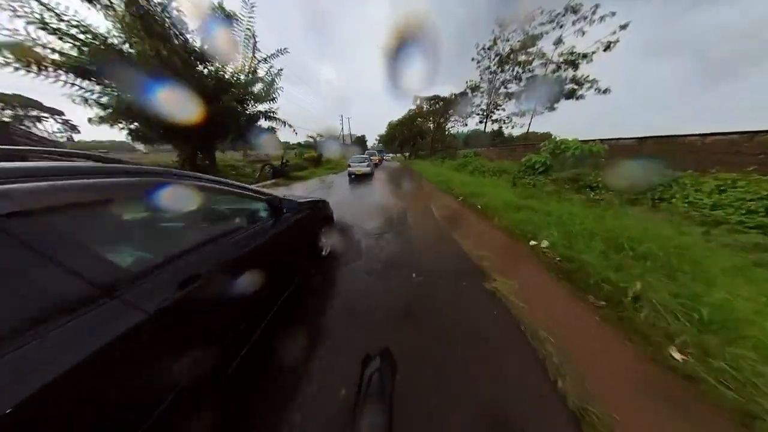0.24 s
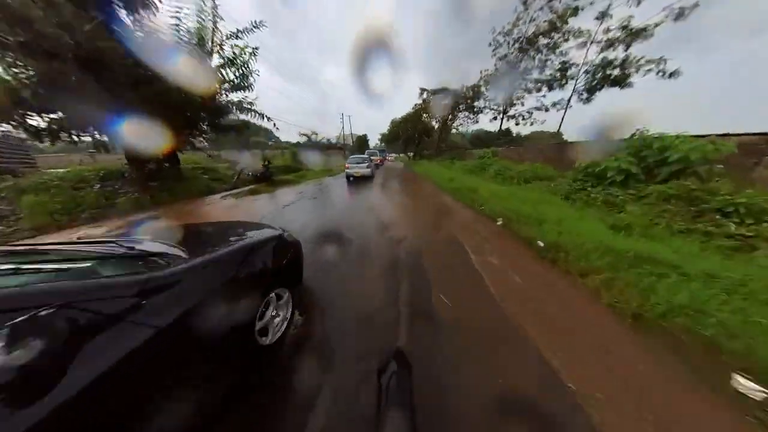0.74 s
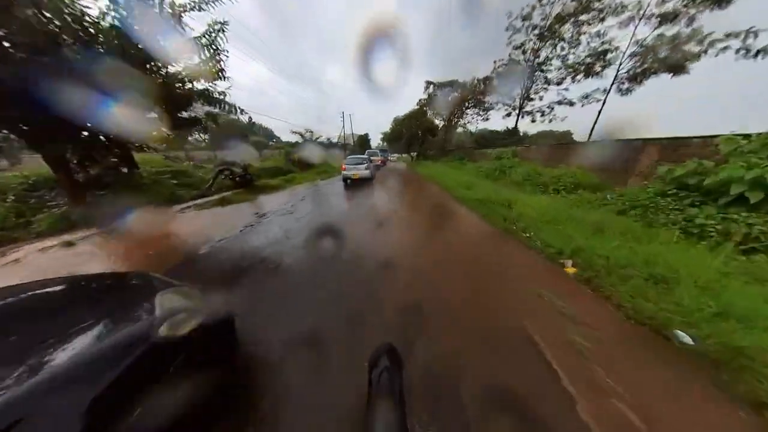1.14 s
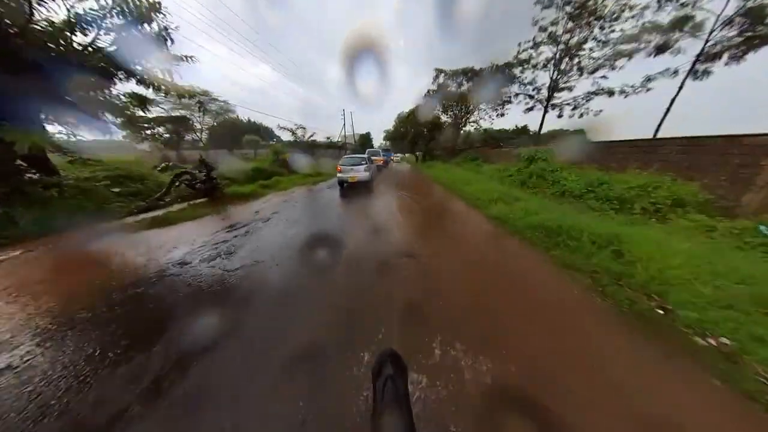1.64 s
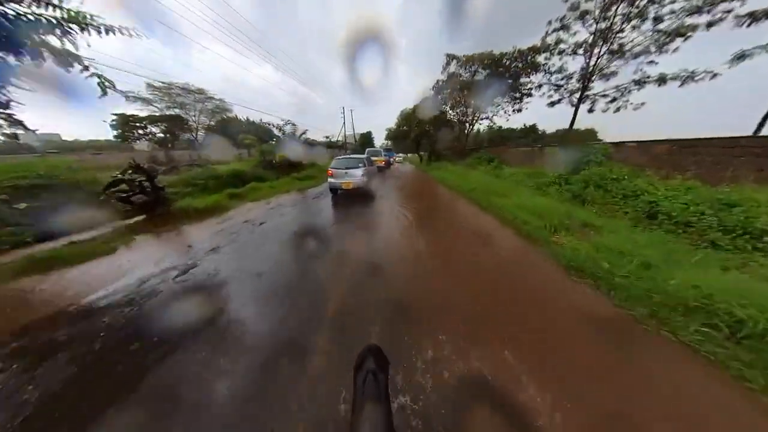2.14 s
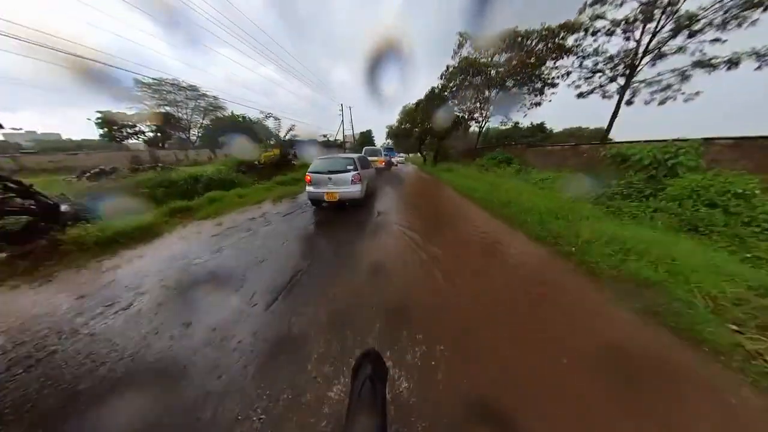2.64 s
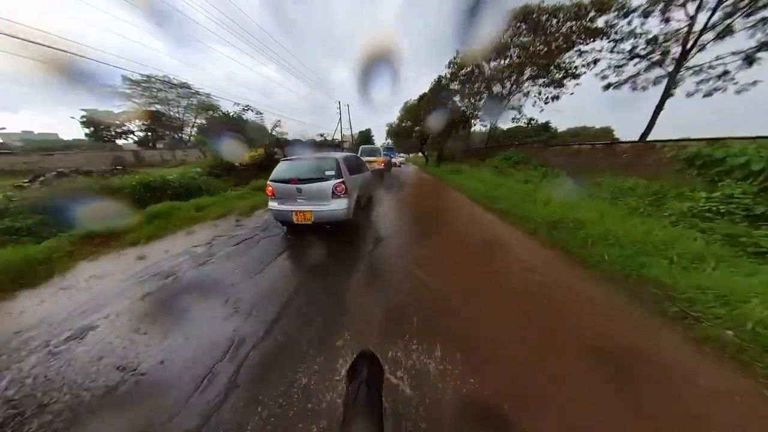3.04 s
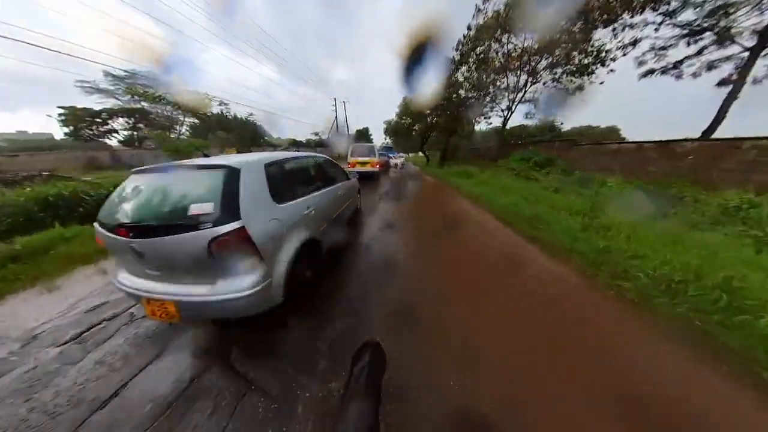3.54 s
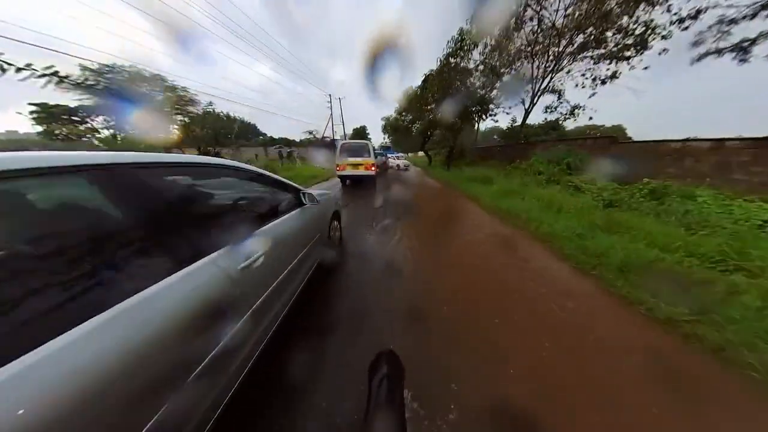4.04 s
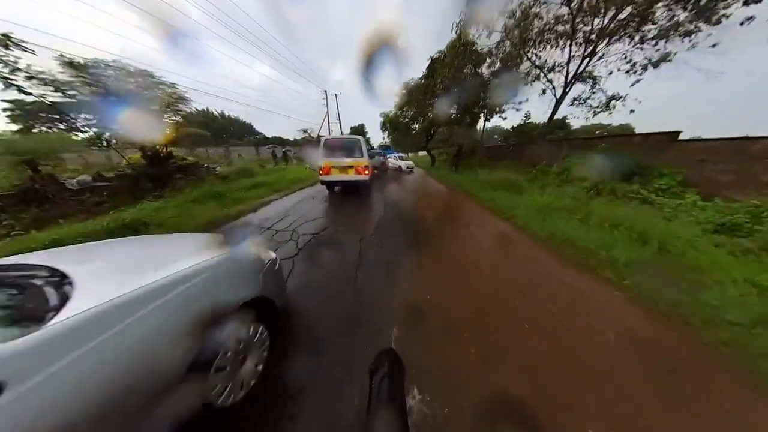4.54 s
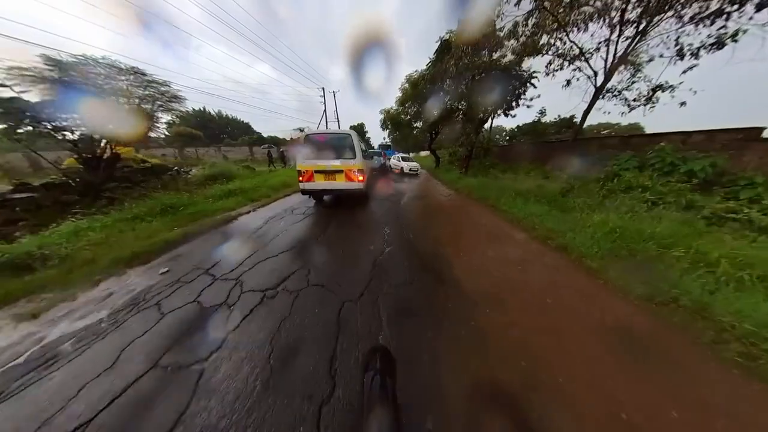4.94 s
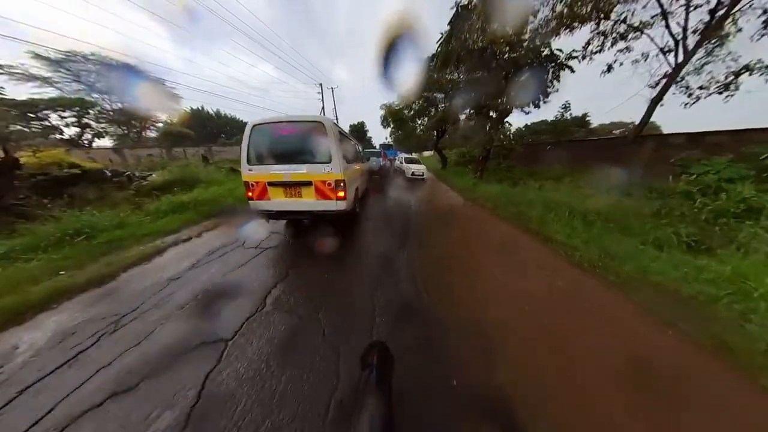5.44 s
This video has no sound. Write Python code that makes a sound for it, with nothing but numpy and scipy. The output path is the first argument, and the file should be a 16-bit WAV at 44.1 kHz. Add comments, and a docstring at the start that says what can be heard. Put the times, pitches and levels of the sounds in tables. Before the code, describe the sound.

Close housing rattle from a single-cylinder motorbike cuts with a ringing click to a clearer exhaust throb, wind and wet tyres.

```python
"""A single-cylinder motorcycle filters past slow cars on a wet road, heard from microphones on the bike.
At first a close, muffled microphone hears only the shaking mount: crank drone, boxy rattle, chatter and knocks.
About two seconds in, the sound switches with a ringing click to an open microphone, over a faint hiss.
It fades up within half a second: exhaust pulses, engine clatter, wind and wet tyres.
Later, drops tick on the housing, gusts thud against it and a stone knocks the engine."""
import sys
import numpy as np
from scipy import signal
from scipy.fft import rfft, irfft, next_fast_len
from scipy.io import wavfile
from scipy.ndimage import uniform_filter1d, map_coordinates

SR = 44100
rng = np.random.default_rng(int(sys.argv[2]) if len(sys.argv) > 2 else 0)


def materialize(psi):
    """Save the field psi as 16-bit PCM at rate SR to the path in sys.argv[1].

    A 1-D psi becomes a single channel; in a 2-D psi each row is a channel.
    """
    bounded = np.clip(np.atleast_2d(psi).T, -1, 1)
    quanta = np.round(bounded * 32767).astype(np.int16)
    wavfile.write(sys.argv[1], SR, quanta)


N = 251603

# Levels are relative: layer trims, normalising and the microphone gains act on them later.
# engine speed: (time [s], firing rate [firings/s])
ENGINE_SPEED = [(0, 23.1), (0.85, 24.1), (1.26, 23.7), (1.44, 18), (1.56, 17), (1.69, 23.3), (1.83, 24.6),
                (1.93, 22.9), (2.03, 22.8), (2.25, 20.07), (2.48, 22.2), (2.94, 22.23), (3.48, 16.08),
                (3.78, 16.99), (4.34, 25.04), (4.85, 26.15), (4.96, 22.85), (5.39, 18.71), (5.71, 21.7)]
FIRING_AT = 2.5285  # the moment of one firing [s]

# crank drone in the mount: (time [s], level [dB])
DRONE_LEVEL = [(0, -23.5), (.27, -22), (.42, -23), (.5, -25.5), (.6, -23), (.7, -29), (.77, -24),
               (.87, -25), (.97, -22), (1.08, -26), (1.25, -23.5), (1.7, -24.5), (1.88, -23), (2.05, -24)]
# brief drops of the drone: (time [s], depth [dB])
DRONE_DIPS = [(.16, 12), (1.795, 19.5)]
DIP_S = 0.028  # half width of a dip, to 1/e of its depth in dB [s]
# The mount drones near cruising speed; at low revs the engine lugs and the mount rattles instead.
CRUISE_RATE = 23.2  # [firings/s]
DRONE_FADE, SWAY_FADE = 0.94, 4.8  # speed drops that give the full change of drone and of the rest [firings/s]
SWAY_DB, THRUM_DB, RATTLE_DB = -31, -34.34, -33  # at cruising speed
SWAY_LUG_DB, DRONE_LUG_DB, THRUM_LUG_DB, RATTLE_LUG_DB = -7.5, -12, 2, 2.5  # change when lugging
DRONE_WAVER_DB = 1.5

# upper engine orders in the mount: (multiple of firing rate, level [dB])
MOUNT_ORDERS = [(3, -4.5), (5, -5.5), (6, 2.5), (7, -13), (8, -5.5), (9, -1.5), (10, -10.5), (11, -10.5),
                (13, -12.5), (14, -13.5), (15, -12.5)]
# road rumble under those orders: (frequency [Hz], level [dB])
THRUM_COLOUR = [(30, -43), (90, -7), (140, 3), (215, -6), (280, -7), (330, -9), (420, -16), (700, -36),
                (1500, -91.5)]
THRUM_RUMBLE = .8  # rumble amplitude against the engine orders

# resonances of the housing, passed twice: (frequency [Hz], width [Hz], level per pass [dB])
HOUSING_MODES = [(505.7, 79, -2), (897.7, 99, 0.5), (1002, 32, 2), (1079, 111, -3), (1642, 120, -13.5),
                 (1770, 130, -14.5), (2245, 79, -15.5), (2480, 170, -20), (3480, 37, -29)]
# tone of the housing after its resonances: (frequency [Hz], level [dB])
HOUSING_COLOUR = [(150, -5.5), (430, -1.5), (680, 1), (900, 0.5), (1190, 2.5), (1420, -9.5), (1580, -0.5),
                  (2550, -6.5), (2900, -8), (3400, -9.5), (4200, -22), (6000, -28)]
# loose parts knocking at fixed points of the cycle: (share of cycle, level [dB])
KNOCKS = [(.03, 0), (.375, -6.5), (.575, -3.5), (.78, -5)]
# rattle with the roughness of the road: (time [s], added level [dB])
ROUGHNESS = [(0, -2), (.1, -2), (.2, -1), (.41, -3.5), (.6, -2), (.82, -.5), (1.0, -1), (1.18, -1),
             (1.28, -2.5), (1.36, -3), (1.43, -2.5), (1.55, -2.5), (1.67, -2.5), (1.76, -2.5), (2.0, -1.5)]
KNOCK_SCRAPE, RATTLE_BED = .6, .6  # scraping in each knock and even chatter, against the clean knock
# panels that buzz when the engine lugs, passed twice: (frequency [Hz], width [Hz], level per pass [dB])
PANELS = [(517, 61, 1), (897, 48, 4)]
BUZZ_DB = -2.5  # over the rattle, at full lugging
# valve tick in the mount: (frequency [Hz], level [dB])
TAPPET_COLOUR = [(1350, -38), (1560, 6), (1850, -2.5), (2100, -14), (2550, -13), (2900, -28), (5000, -50)]
TAPPET_AT, TAPPET_DB = 0.58, -34.5  # share of the cycle, level over the rattle

# fine grit in the mount's rasp: (time [s], level [dB])
GRIT_LEVEL = [(0, -66.5), (.2, -71), (.4, -73), (.75, -70), (.85, -71), (.92, -65), (1.02, -72),
              (1.15, -68), (1.35, -75), (1.52, -71), (1.65, -64), (1.75, -69), (1.88, -67.5), (2.0, -74)]
# tone of the grit: (frequency [Hz], level [dB])
GRIT_COLOUR = [(1200, -29), (1600, 6.5), (1900, 2.5), (2100, -6), (2550, -1), (2850, -14.5), (3400, -14),
               (3600, -20), (4100, -19), (4800, -30), (8000, -52.5)]
GRIT_ROUGH_DB = 1.5

# knocks of the mount, from bumps and from the lugging engine: (time [s], level [dB])
MOUNT_KNOCKS = [(0.107, -29), (0.212, -25), (0.583, -26), (0.726, -24), (0.852, -25), (1.059, -28),
                (1.102, -23), (1.271, -24), (1.304, -26), (1.419, -22), (1.5, -21), (1.563, -19),
                (1.579, -22), (1.604, -18), (1.629, -21), (1.653, -16.5), (1.674, -21), (1.705, -22),
                (1.755, -23), (1.829, -24)]
# ring of the knocked mount: (frequency [Hz], level [dB], t60 [s])
MOUNT_RING = [(520, -10, .05), (910, 0, .075), (1010, -10, .03), (1095, -7, .035)]
MOUNT_KNOCK_DB, SCRABBLE_T60, SCRABBLE_SHARE = 1, 0.04, 0.2  # gain; scrabble of loose parts: decay [s], share
# thumps of the mount on the roughest bumps: (time [s], level [dB])
THUMPS = [(.9, -23), (1.06, -22), (1.586, -16.5)]
# tone of a thump: (frequency [Hz], level [dB])
THUMP_COLOUR = [(90, -33), (170, -7.5), (225, 4.5), (300, -6), (450, -29), (900, -83.5), (3000, -130)]

# clicks at the microphone switch: (time [s], level [dB])
CLICKS = [(2.0155, -29), (2.0347, -7.5), (2.0752, -38.5)]
# ring of the clicks: (frequency [Hz], level [dB], t60 [s])
CLICK_RING = [(71, -4, 0.039), (167, -3.5, 0.03), (578, 10, 0.0094), (790, -10.5, 0.02), (1054, -1, 0.025),
              (2010, -22, 0.0075), (2900, -12.5, 0.0072)]
# tone of the crack and hiss at the switch: (frequency [Hz], level [dB])
SWITCH_COLOUR = [(400, 0), (1500, 5), (3000, 0), (5000, -3), (7200, -1), (8300, -27), (10000, -45.5)]
SWITCH_HISS_DB = -66.5  # before the open microphone fades up
DROP_AT, FADE_IN_AT = 2.035, 2.092  # the close microphone falls quieter; the open one starts to fade in [s]
CLOSE_DB, CLOSE_DROP_DB, CLOSE_FALL_DB_PER_S = .5, 11.5, 903  # close microphone: gain, first drop, final fall
FADE_IN_S, FADE_START_DB, FADE_CURVE = 0.5, -32.5, 1.69  # fade-in time [s], gain at its start, slowing at its end

# throttle heard as exhaust: (time [s], level [dB])
THROTTLE = [(2.3, -24), (2.6, -23.5), (2.95, -22.5), (3.15, -23.5), (3.4, -23.5), (3.7, -24.5), (3.87, -21),
            (4.05, -23), (4.2, -22.5), (4.38, -22.5), (4.8, -23.5), (5.0, -23), (5.35, -23), (5.5, -21.5),
            (5.7, -24.5)]
# firings that burn weakly on a closing throttle: (time [s], loss [dB])
WEAK_FIRINGS = [(2.98, 0), (3.07, 1), (3.515, 8), (3.7, 3.5), (4.875, 4), (5.152, 6), (5.24, 3.5)]
# exhaust thud: (frequency [Hz], level [dB])
THUD_COLOUR = [(15, -34), (30, -10), (45, -16.5), (65, -9), (90, 0), (112, 7.5), (129, 7), (150, -3.5),
               (185, -31), (230, -20), (400, -61.5), (900, -95.5), (3000, -140)]
# silencer chamber ringing on between firings: (frequency [Hz], width [Hz], level [dB])
SILENCER = [(127.7, 20, 0)]
# tone of that ringing: (frequency [Hz], level [dB])
SILENCER_COLOUR = [(170, -2), (400, -38.5), (2000, -91.5)]
SILENCER_DB = -8  # against the thud
# bark between the thuds: (frequency [Hz], level [dB])
BARK_COLOUR = [(110, -26), (175, -0.5), (222, 1.5), (245, 1.5), (275, -22), (700, -58.5), (1500, -110)]
# upper ring of the exhaust pipe: (frequency [Hz], level [dB])
PIPE_COLOUR = [(240, -28.5), (310, 2.5), (365, 1), (395, -9.5), (440, -30), (1500, -110)]
# upper ring of the exhaust pipe: (time [s], level [dB])
PIPE_LEVEL = [(2.4, -39), (2.7, -38), (3.0, -41), (3.35, -40.5), (3.6, -49), (3.85, -36.5), (4.0, -34.5),
              (4.15, -39), (4.28, -38.5), (4.58, -50), (4.9, -40), (5.1, -44), (5.3, -35), (5.7, -39.5)]
# speeds at which a softer leading puff sets in and is full: (onset [firings/s], full [firings/s])
PUFF_RATES = (19, 22)
PUFF_LEAD, PUFF_SHARE = .355, .38  # lead [cycles], full size against the thud
THUD_HZ, THUD_LAG_S_PER_HZ = 120, 1.3e-4  # each thud sinks in pitch: its lower tones leave the silencer later
STUMBLE = 0.016  # scatter of the firing moment while the engine slows [cycles]
FIRING_SCATTER_DB, BARK_SCATTER_DB, TAPPET_SCATTER_DB = .6, 1.2, 1.2  # from one pulse to the next

# hum of the engine in the open air: (multiple of firing rate, level [dB])
ENGINE_TONES = [(2, -13), (6, -14.5), (7, -26), (8, -15), (9, -18), (10, -18.5), (12, -31), (16, -22.5)]
# rush of engine, chain and tyres: (frequency [Hz], level [dB])
CLATTER_COLOUR = [(240, -27), (400, -3), (450, -0.5), (552, -4), (655, -8), (722, 1), (904, -5), (1110, -8),
                  (1470, -14.5), (1860, -19), (2040, -20), (2530, -19), (3500, -34.5), (4520, -47.5),
                  (5200, -51.5), (6760, -70), (11400, -120)]
RUSH_DB, RUSH_WAVER_DB, RUSH_DB_PER_OCTAVE = -37.0, 0.5, -0.5  # clatter and wind: level, waver, change with speed
# ringing engine cover: (time [s], level [dB])
COVER_LEVEL = [(2.5, -3.5), (2.9, -6), (3.0, -3), (3.17, 7), (3.3, 1), (3.38, -3), (3.48, -6), (3.8, -16),
               (3.93, 5), (4.15, 5.5), (4.25, -2.5), (4.65, -4), (4.77, 5), (4.93, -9), (5.25, 8.5),
               (5.45, -5.5), (5.7, 4)]
# resonances of the cover: (frequency [Hz], width [Hz], level [dB])
COVER_MODES = [(700, 25, -2.5), (820, 100, -7.5)]
# tone of the cover: (frequency [Hz], level [dB])
COVER_COLOUR = [(2500, 4), (5000, -33.0)]
# resonances of the valve gear: (frequency [Hz], width [Hz], level [dB])
VALVE_MODES = [(1310, 140, -0.54), (1870, 150, -0.46)]
# tone of the valve gear: (frequency [Hz], level [dB])
VALVE_COLOUR = [(2200, 9), (3500, -26)]

# wind at the microphone, sheltered alongside a car: (time [s], level [dB])
GUSTS = [(2.4, -3), (3.3, 1.5), (3.6, -0.5), (3.95, 1), (4.25, -2.5), (4.42, -2.5), (4.75, -3),
         (4.88, -1.5), (5.1, 0), (5.55, 1.5), (5.7, -4)]
# tone of the wind: (frequency [Hz], level [dB])
WIND_COLOUR = [(12, -26.5), (28, -11), (50, -5), (62, -6), (82, 0), (115, -8), (180, -8), (225, -5),
               (265, -9.5), (320, -10.5), (370, -12), (430, -17), (700, -25), (2000, -86.5), (5000, -130)]

# swish of the treads in the water, swelling near 4.4 s and at the end: (time [s], level [dB])
TREAD_LEVEL = [(2.5, -51), (3.5, -53), (3.9, -49.5), (4.4, -47), (4.8, -49.5), (5.0, -52), (5.2, -49),
               (5.7, -46.5)]
# tone of the treads: (frequency [Hz], level [dB])
TREAD_COLOUR = [(500, -20.5), (1000, -11), (1420, 3.5), (1650, 1.5), (1870, 0), (2150, -1), (2700, -7.5),
                (3600, -13.5), (5000, -53)]
# air ringing in the tread grooves, passed twice: (frequency [Hz], width [Hz], level [dB])
GROOVES = [(1483, 190, -3.5), (1837, 190, -7.5)]
# tyre spray with the wetness of the road: (time [s], level [dB])
WETNESS = [(2.6, -56.5), (3.3, -51.5), (3.65, -55.5), (4.75, -56), (5.7, -63)]
# fine hiss of the spray: (frequency [Hz], level [dB])
SPRAY_COLOUR = [(3000, -49), (4900, -20), (5600, -9.5), (6300, -1), (7450, 4.5), (8000, -3), (8900, -12.5),
                (9300, -32), (11000, -53)]
# lower swish of the spray: (frequency [Hz], level [dB])
SPRAY_SWISH_COLOUR = [(1200, -20.0), (2400, 2.5), (3100, -1.5), (3800, -4.0), (4600, -21.5), (6000, -54.5)]

# drops that hit the housing: (time [s], level [dB])
DROPS = [(3.281, -43), (3.335, -44), (3.633, -35.5), (4.8034, -39), (5.092, -45), (5.215, -29),
         (5.468, -44)]
# tone of a drop: (frequency [Hz], level [dB])
DROP_COLOUR = [(1500, -14), (3000, -5), (4800, -15), (6200, 5.5), (7400, 13), (8800, -5), (10300, -34),
               (12000, -62), (15000, -90)]
SPLASH_DB, SPLASH_T60 = -19.5, 0.037  # splash after each tick: level, decay [s]
# gusts that buffet the housing: (time [s], level [dB])
BUFFETS = [(3.3, -32), (3.6, -29), (3.95, -35), (4.88, -30), (5.0, -30), (5.44, -34), (5.69, -24)]
# tone of a buffet: (frequency [Hz], level [dB])
BUFFET_COLOUR = [(30, -24.5), (65, -2), (88, 2), (110, -6), (160, -33), (400, -74), (2000, -140)]
BUFFET_S = 0.052  # half width of a gust, to 1/e of its amplitude [s]
# stones that knock the engine cover: (time [s], level [dB])
STONES = [(3.358, -27)]
# tone of a stone: (frequency [Hz], level [dB])
STONE_COLOUR = [(350, -27.0), (600, -1.0), (780, 3.5), (1100, -17.0), (3000, -43), (8000, -100)]
TOP_HZ = 15800  # band limit of the output [Hz]


def amp(db):
    """Decibels to gain."""
    return 10 ** (np.asarray(db) / 20)


def unit(x):
    """Scale to rms 1."""
    return x / np.sqrt(np.mean(x ** 2) + 1e-20)


def curves(rows):
    """One value per sample for each column after the time."""
    times, *columns = np.transpose(rows)
    return [np.interp(np.arange(N) / SR, times, column) for column in columns]


def wobble(rate):
    """A smooth random curve, rate knots a second."""
    knots = rng.standard_normal(int(N * rate / SR) + 4)
    return map_coordinates(knots, [np.arange(N) * rate / SR])


def filtered(x, response):
    """x times a response of frequency, padded so that tails do not wrap."""
    size = next_fast_len(N + SR // 2)
    return irfft(rfft(x, size) * response(np.fft.rfftfreq(size, 1 / SR)), size)[:N]


def coloured(x, spectrum):
    """x shaped by (frequency [Hz], level [dB]) points on a log frequency axis, at rms 1."""
    f, db = np.transpose(spectrum)
    return unit(filtered(x, lambda hz: amp(np.interp(np.log(hz + 1), np.log(f), db))))


def resonate(x, modes):
    """x rung through parallel band-pass resonances of alternating sign."""
    def response(f):
        total = 0
        for k, (centre, width, db) in enumerate(modes):
            damping = 1j * f * width
            total = total + (-1) ** k * amp(db) * damping / (centre * centre - f * f + damping)
        return total
    return filtered(x, response)


def noise():
    """White noise of rms 1."""
    return rng.standard_normal(N)


def pulses(cycle, scatter_db):
    """One impulse of random size each time the cycle count passes a whole number."""
    return np.diff(np.floor(cycle), prepend=np.floor(cycle[0])) * amp(scatter_db * noise())


def tail_time():
    """Time along a tenth of a second of decay [s]."""
    return np.arange(SR // 10) / SR


def bursts(hits, t60):
    """A dying puff of noise after each impulse, at rms 1."""
    decay = amp(-60 * tail_time() / t60)
    return unit(signal.fftconvolve(hits, decay)[:N] * noise())


def blows(events):
    """One impulse for each (time [s], level [dB]) row."""
    hits = np.zeros(N)
    for s, db in events:
        hits[round(s * SR)] = amp(db)
    return hits


def dips(rows):
    """Loss in dB, a bell shape round each (time [s], depth [dB]) row."""
    t = np.arange(N) / SR
    return sum(depth * np.exp(-((t - s) / DIP_S) ** 2) for s, depth in rows)


def engine_cycle():
    """Count of four-stroke cycles: one firing and two crank turns each."""
    cycle = np.cumsum(curves(ENGINE_SPEED)[0]) / SR
    return cycle - cycle[round(FIRING_AT * SR)]


def shaking():
    """Levels in dB of crank sway, drone, thrum and rattle, and how much the engine lugs below cruising (0-1)."""
    slow = CRUISE_RATE - curves(ENGINE_SPEED)[0]
    lug = np.clip(slow / SWAY_FADE, 0, 1)
    detuned = np.clip(slow / DRONE_FADE, 0, 1)
    dip_db = dips(DRONE_DIPS)
    sway_db = SWAY_DB + SWAY_LUG_DB * lug - .5 * dip_db
    drone_db = curves(DRONE_LEVEL)[0] + DRONE_LUG_DB * detuned - dip_db + DRONE_WAVER_DB * wobble(29)
    thrum_db = THRUM_DB + THRUM_LUG_DB * lug
    rattle_db = RATTLE_DB + RATTLE_LUG_DB * lug + curves(ROUGHNESS)[0]
    return sway_db, drone_db, thrum_db, rattle_db, lug


def crank_drone(cycle, sway_db, drone_db):
    """The piston shakes the mount once (sway) and twice (drone) per crank turn."""
    crank = 2 * np.pi * 2 * cycle
    return amp(sway_db) * unit(np.sin(crank)) + amp(drone_db - 1.5) * unit(np.sin(2 * crank))


def grit(cycle):
    """Fine uneven chatter in the mount, swelling once a cycle about the valve tick."""
    swell = 1 + 0.5 * np.cos(2 * np.pi * (cycle - TAPPET_AT - .1))
    chatter = noise() * swell * amp(GRIT_ROUGH_DB * wobble(200))
    return amp(curves(GRIT_LEVEL)[0]) * coloured(chatter, GRIT_COLOUR)


def thrum(cycle):
    """Weaker engine orders, each wavering on its own, over road rumble."""
    lines = sum(amp(db + 1.8 * wobble(8)) * np.sin(2 * np.pi * (order * cycle + rng.random()))
                for order, db in MOUNT_ORDERS)
    return unit(unit(lines) + THRUM_RUMBLE * coloured(noise(), THRUM_COLOUR))


def housing(x):
    """x rung through the mount and the shell of the microphone housing, at rms 1."""
    return coloured(resonate(resonate(x, HOUSING_MODES), HOUSING_MODES), HOUSING_COLOUR)


def rattle(cycle, lug):
    """Loose parts knock and scrape in the housing, the valve ticks, and panels buzz as the engine lugs."""
    hits = sum(amp(db) * pulses(cycle - at + .012 * wobble(25), scatter_db=0.67) for at, db in KNOCKS)
    knocks = unit(hits) + KNOCK_SCRAPE * bursts(hits, t60=0.049) + RATTLE_BED * noise()
    ticks = pulses(cycle - TAPPET_AT, TAPPET_SCATTER_DB)
    tappet = coloured(bursts(ticks, t60=0.027), TAPPET_COLOUR)
    buzz = unit(resonate(resonate(knocks, PANELS), PANELS))
    return housing(knocks) + amp(TAPPET_DB) * tappet + amp(BUZZ_DB) * lug * buzz


def mount(cycle):
    """The running engine as it reaches the close microphone through the mount."""
    sway_db, drone_db, thrum_db, rattle_db, lug = shaking()
    steady = crank_drone(cycle, sway_db, drone_db) + amp(thrum_db) * thrum(cycle)
    return steady + grit(cycle) + amp(rattle_db) * rattle(cycle, lug)


def mount_knocks():
    """Bumps and the lugging engine knock the mount: damped tones, and loose parts scrabble in the housing."""
    t = tail_time()
    ring = sum(amp(db - 60 * t / t60) * np.sin(2 * np.pi * hz * t) for hz, db, t60 in MOUNT_RING)
    ring = ring * (1 - np.exp(-(t / .0016) ** 2))  # soft onset
    hits = blows(MOUNT_KNOCKS)
    knock = signal.fftconvolve(hits, ring / np.abs(ring).max())[:N]
    knock = filtered(knock, lambda hz: 1 / (1 + (hz / 1400) ** 8))
    scrabble = housing(bursts(hits, t60=SCRABBLE_T60))
    scrabble = hits.max() * scrabble / np.abs(scrabble).max()
    return amp(MOUNT_KNOCK_DB) * (knock + SCRABBLE_SHARE * scrabble)


def thumps():
    """Big bumps flex the mount with a dull thump of low noise."""
    t = np.arange(N) / SR
    envelope = sum(amp(db - 10.0 - 60 * np.abs(t - s) / 0.29) * (t >= s) for s, db in THUMPS)
    return uniform_filter1d(envelope, size=400) * coloured(noise(), THUMP_COLOUR)


def switch_click():
    """A switching click: damped tones and a crack of noise."""
    t = tail_time()
    ring = sum((-1) ** k * amp(db - 60 * t / t60) * np.sin(2 * np.pi * hz * t)
               for k, (hz, db, t60) in enumerate(CLICK_RING))
    ring = ring * (1 - np.exp(-t / .0006))  # soft onset
    crack = amp(-48.0 - 60 * t / 0.075) * coloured(noise(), SWITCH_COLOUR)[:len(t)]
    return signal.fftconvolve(blows(CLICKS), ring + crack)[:N]


def microphone_switch():
    """Gains of close microphone, open microphone and hiss across the switch."""
    t = np.arange(N) / SR
    since = np.maximum(t - FADE_IN_AT, 0)
    switched = t > FADE_IN_AT
    drop = np.clip((t - DROP_AT) / 0.0059, 0, 1)
    close_gain = amp(CLOSE_DB - CLOSE_DROP_DB * drop - CLOSE_FALL_DB_PER_S * since)
    fade_left = np.clip(1 - since / FADE_IN_S, 0, 1) ** FADE_CURVE
    open_gain = switched * amp(FADE_START_DB * fade_left)
    return close_gain, open_gain, switched * (1 - open_gain) * amp(SWITCH_HISS_DB)


def sinking(hz):
    """All-pass response that delays the low part of a thud."""
    return np.exp(1j * np.pi * THUD_LAG_S_PER_HZ * (np.minimum(hz, 2 * THUD_HZ) - THUD_HZ) ** 2)


def exhaust(cycle, level_db):
    """Each firing swells and dies in the silencer, with a bark between thuds; a slowing engine stumbles."""
    speed = curves(ENGINE_SPEED)[0]
    slowing = np.clip(-np.gradient(speed) * SR / 10, 0, 1)
    cycle = cycle + STUMBLE * uniform_filter1d(slowing, size=4000) * wobble(22)
    # a softer puff leads each thud once the engine is pulling
    puff_size = PUFF_SHARE * np.interp(speed, PUFF_RATES, (0, 1))
    puffs = puff_size * pulses(cycle + PUFF_LEAD, FIRING_SCATTER_DB)
    firings = -(pulses(cycle, FIRING_SCATTER_DB) + puffs) * amp(-dips(WEAK_FIRINGS))
    thud = coloured(filtered(firings, sinking), THUD_COLOUR)
    chamber = coloured(resonate(firings, SILENCER), SILENCER_COLOUR)
    boom = unit(thud + amp(SILENCER_DB) * chamber)
    echoes = pulses(cycle + .42, BARK_SCATTER_DB) + pulses(cycle - .17, BARK_SCATTER_DB)
    bark = amp(-15.0) * coloured(echoes, BARK_COLOUR)
    pipe = coloured(unit(echoes) + 0.3 * bursts(echoes, t60=.04), PIPE_COLOUR)
    return amp(level_db - 0.73) * (boom + bark) + amp(curves(PIPE_LEVEL)[0]) * pipe


def engine_tones(cycle, level_db):
    """Crankcase and gears hum on multiples of the firing rate and glide with the engine speed."""
    lines = sum(amp(db + 1.5 * wobble(5)) * np.sin(2 * np.pi * order * cycle) for order, db in ENGINE_TONES)
    return amp(level_db) * lines


def cover(cycle):
    """An engine cover rings with each firing."""
    blow = pulses(cycle - .07, scatter_db=2.0)
    ring = resonate(0.54 * unit(blow) + bursts(blow, t60=0.13), COVER_MODES)
    return 0.37 * amp(curves(COVER_LEVEL)[0]) * coloured(ring, COVER_COLOUR)


def valve_rasp(cycle):
    """The valve gear, tapping twice a cycle, rasps harder as the engine turns faster."""
    speed = curves(ENGINE_SPEED)[0]
    taps = bursts(pulses(2 * cycle + .3, scatter_db=2.5), t60=.05)
    return 0.18 * (speed / speed.max()) * coloured(resonate(taps, VALVE_MODES), VALVE_COLOUR)


def clatter(cycle, level_db):
    """Valve and piston ticks ride on a rush of chain and tyres, with the cover and valve gear over it."""
    cycle_ticks = bursts(pulses(cycle + .2, scatter_db=2), t60=.06)
    stroke_ticks = bursts(pulses(2 * 2 * cycle + .5, scatter_db=2.5), t60=.02)  # four a cycle
    rush = noise() * amp(1.3 * wobble(30))
    body = coloured(rush + .35 * cycle_ticks + .35 * stroke_ticks, CLATTER_COLOUR)
    return amp(level_db - 2.0) * (body + cover(cycle) + valve_rasp(cycle))


def wind(cycle, level_db):
    """Lumpy air noise round the bike, with an intake gulp between firings."""
    gulp = 1 + 0.2 * np.cos(2 * np.pi * (cycle - .55))
    return amp(level_db + 5.5) * coloured(noise() * gulp * amp(0.48 * wobble(19)), WIND_COLOUR)


def treads():
    """Tyres tear through the water on the road in rough clumps of splashes; the grooves ring in patches."""
    clumps = amp(3.4 * wobble(45) + 3 * wobble(350))
    grooves = 0
    for hz, width, db in GROOVES:
        groove = [(hz, width, 0)]
        grooves = grooves + amp(db + 3 * wobble(14)) * unit(resonate(resonate(noise(), groove), groove))
    return amp(curves(TREAD_LEVEL)[0] - 3.0) * (coloured(noise() * clumps, TREAD_COLOUR) + grooves)


def spray(level_db):
    """Fine droplets thrown off the tyre hiss, over the lower swish of the tread in the water."""
    hiss = coloured(noise() * amp(1.5 * wobble(400)), SPRAY_COLOUR)
    swish = coloured(noise(), SPRAY_SWISH_COLOUR)
    return amp(level_db + 1.2 * wobble(12)) * (hiss + amp(-5) * swish)


def drops():
    """Single drops tick sharply on the housing and splash."""
    hits = blows(DROPS)
    tick = coloured(hits, DROP_COLOUR)
    tick = hits.max() * tick / np.abs(tick).max()
    t = tail_time()
    envelope = amp(-10 - 60 * t / 0.0086) + amp(SPLASH_DB - 60 * t / SPLASH_T60)
    splash = signal.fftconvolve(hits, envelope)[:N] * coloured(noise(), DROP_COLOUR)
    return tick + splash


def buffets():
    """Short gusts thud softly against the housing as bell-shaped swells of low noise."""
    t = np.arange(N) / SR
    envelope = sum(amp(db) * np.exp(-((t - s) / BUFFET_S) ** 2) for s, db in BUFFETS)
    return envelope * coloured(noise(), BUFFET_COLOUR)


def stones():
    """A stone thrown up by the front wheel knocks dully on the engine: a decaying puff of coloured noise."""
    hits = blows(STONES)
    ring = coloured(bursts(hits, t60=0.11), STONE_COLOUR)
    return hits.max() * ring / np.abs(ring).max()


def scene():
    """The close microphone hears the mount; after the switch the open one hears engine, air and road."""
    cycle = engine_cycle()
    close_gain, open_gain, hiss_gain = microphone_switch()
    close = mount(cycle) + mount_knocks() + thumps()
    switching = switch_click() + hiss_gain * coloured(noise(), SWITCH_COLOUR)

    exhaust_db = curves(THROTTLE)[0]
    octaves = np.log2(curves(ENGINE_SPEED)[0] / CRUISE_RATE)
    rush_db = RUSH_DB + RUSH_DB_PER_OCTAVE * octaves + RUSH_WAVER_DB * wobble(5.375)
    engine = exhaust(cycle, exhaust_db) + engine_tones(cycle, exhaust_db) + clatter(cycle, rush_db)
    moving_air = wind(cycle, rush_db + curves(GUSTS)[0]) + buffets()
    wet_road = treads() + spray(curves(WETNESS)[0]) + drops() + stones()
    open_air = engine + moving_air + wet_road

    floor = amp(-91.5) * noise()
    return (close_gain * close + switching + open_gain * open_air + floor)[None]


def record(dry):
    """Loud peaks overload softly, and nothing passes above the band limit."""
    soft = dry / (1 + np.abs(dry / .5) ** 6) ** (1 / 6)
    return np.array([filtered(x, lambda hz: hz < TOP_HZ) for x in soft])


dry = scene()
out = record(dry)
materialize(out)
```